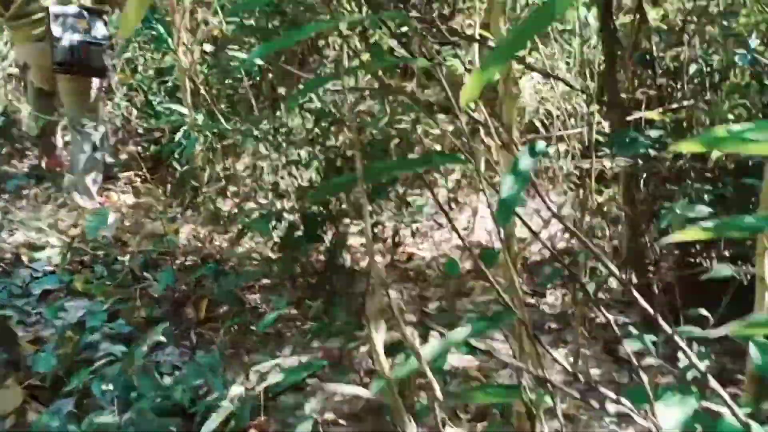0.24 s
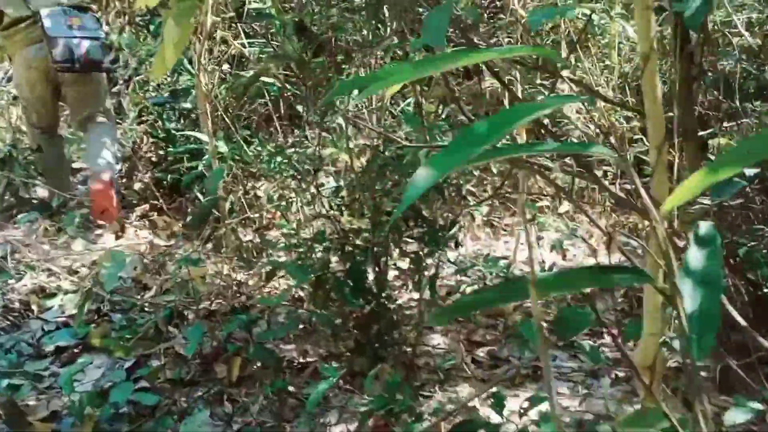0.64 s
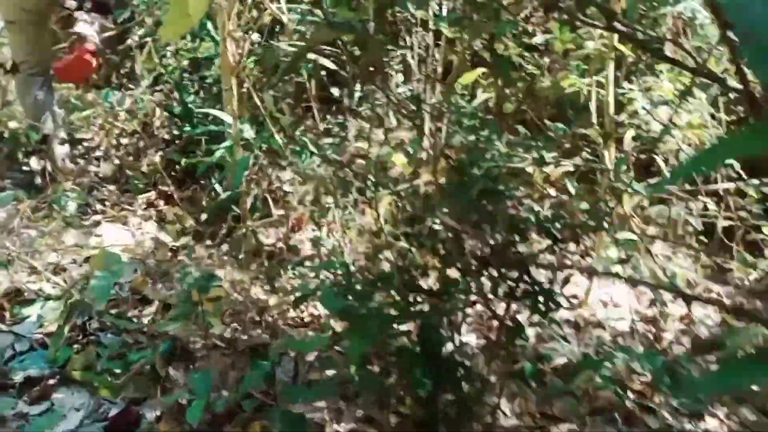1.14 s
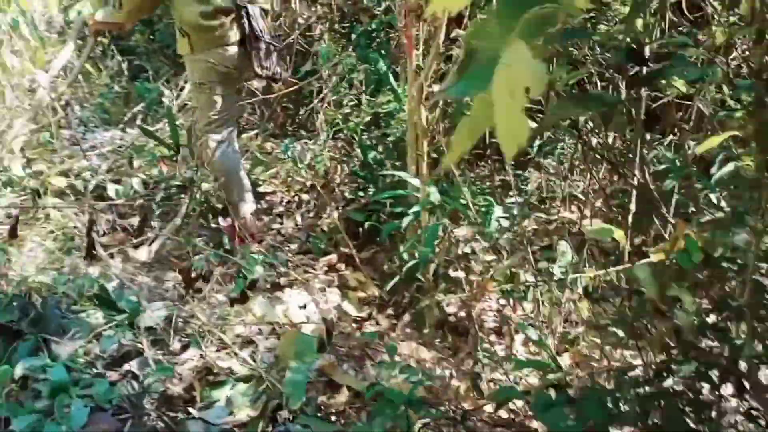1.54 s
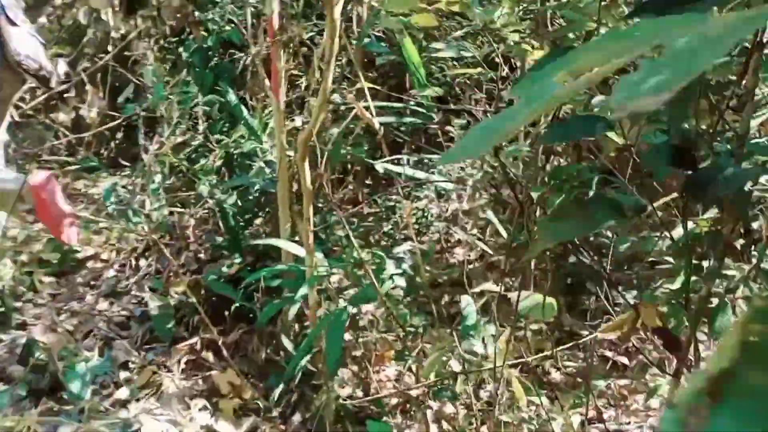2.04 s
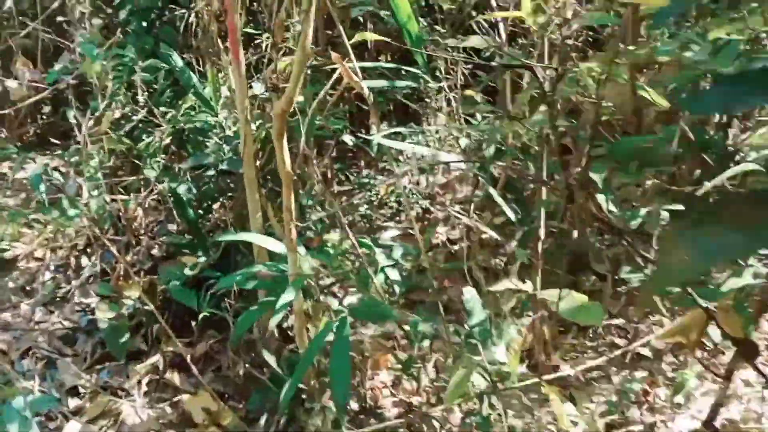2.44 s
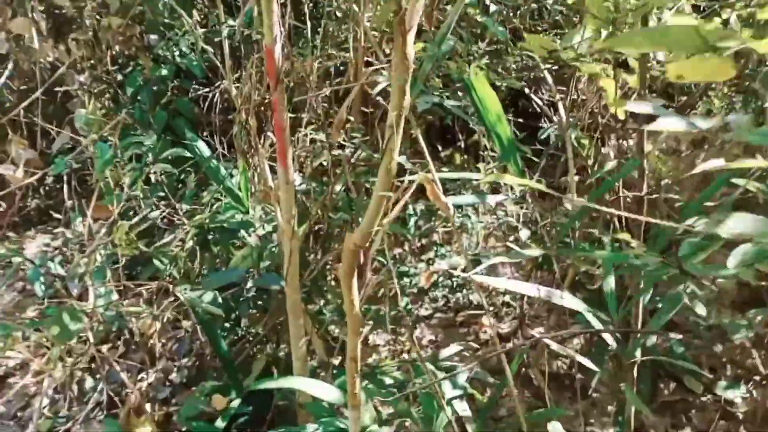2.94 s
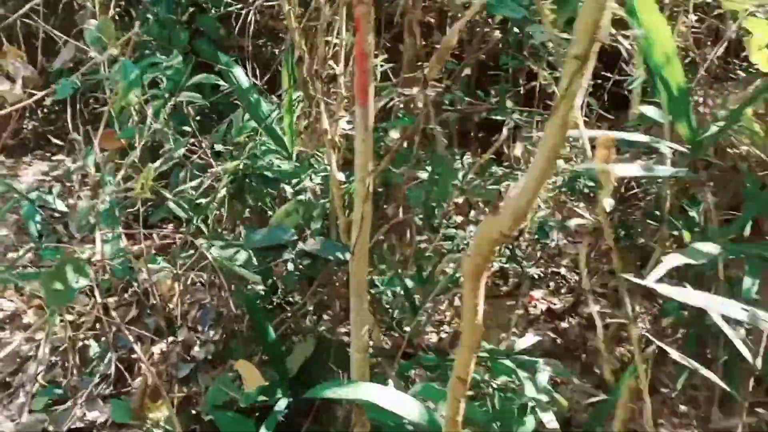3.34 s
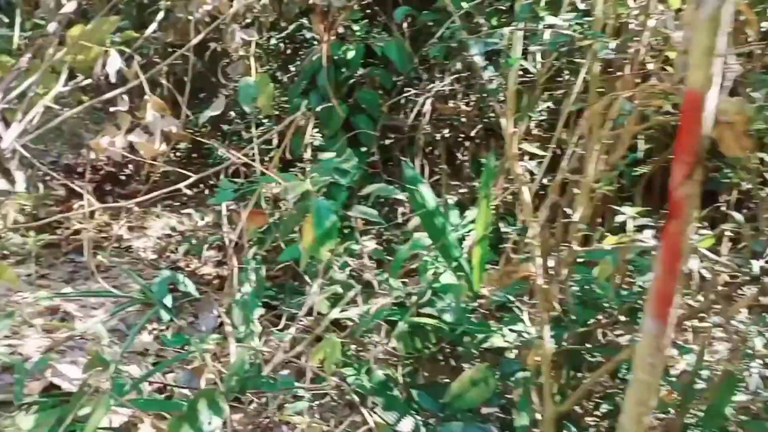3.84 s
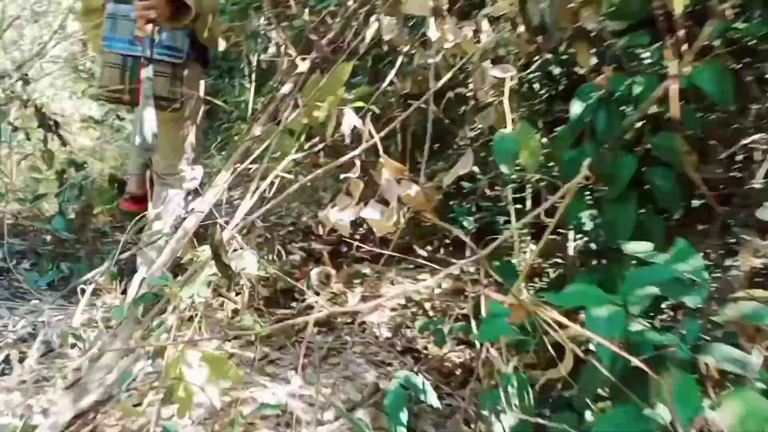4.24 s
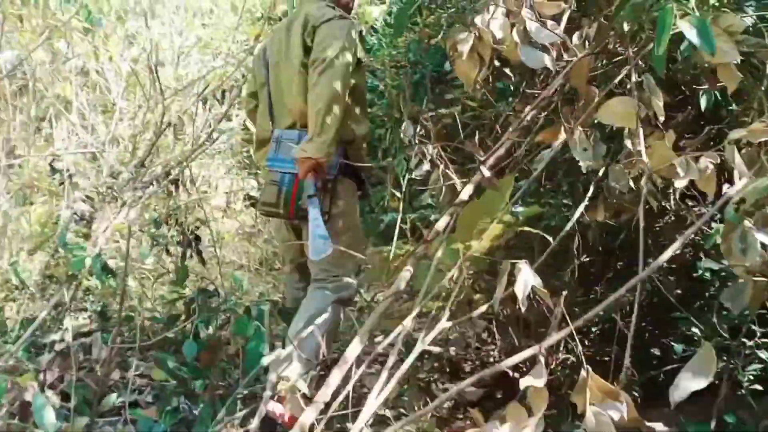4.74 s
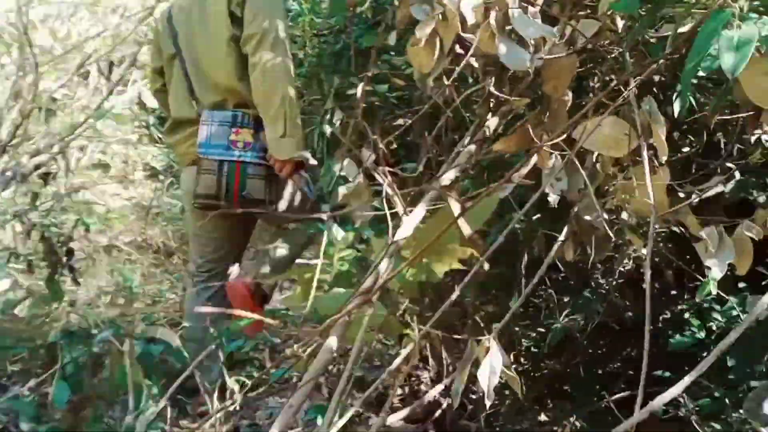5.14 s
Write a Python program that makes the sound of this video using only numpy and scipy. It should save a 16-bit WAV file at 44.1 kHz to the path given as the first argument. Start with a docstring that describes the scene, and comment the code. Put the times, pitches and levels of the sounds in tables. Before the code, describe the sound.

Footsteps crunch unevenly through dry leaves in a forest, with twigs snapping and foliage rustling against legs.

```python
"""Walking through dry leaves

Someone walks through forest litter and undergrowth, with a second walker a few metres ahead.
Each step crushes brittle leaves, whose many tiny fractures sum to a crunch; legs brush the foliage
in between. Weight thuds dully on the soil, and twigs snap underfoot and ring briefly.
Trunks scatter the snaps and the rustle, over a faint low rumble of air."""
import sys
import numpy as np
from scipy import signal
from scipy.io import wavfile

SR = 44100
rng = np.random.default_rng(int(sys.argv[2]) if len(sys.argv) > 2 else 0)


def persist_wave(psi):
    """Save psi, clipped to +-1, as 16-bit WAV."""
    counts = np.round(np.clip(psi, -1, 1) * 32767).astype(np.int16)
    wavfile.write(sys.argv[1], SR, np.atleast_2d(counts).T)


N = 237213
TIME, HZ = np.arange(N) / SR, np.fft.rfftfreq(N, 1 / SR)

# overall tone of the crunch and snaps, including the microphone's humps and dips: frequency_hz, gain_db
CRUNCH_COLOUR = [(130, -23.5), (320, -15.5), (650, -13), (1150, -8.5), (1750, -3.5), (2450, 0.5),
                 (3100, -.5), (3700, -4), (4480, -9.5), (5870, -1), (7400, 2), (9900, -14), (12500, -7.5),
                 (15500, -14.5)]
# frequency zones of pressing, crushing, rubbing and fizz: low_hz, centre_hz, high_hz
LEAF_ZONES = [(170, 550, 1200), (1200, 2500, 4500), (4500, 7000, 9800), (9800, 11500, 16000)]
# continuous rustle between steps: time_s, level_db
RUSTLE_LEVELS = [(0, -43.5), (.42, -45), (.53, -46), (.95, -43), (1.1, -45), (1.5, -43), (1.98, -42),
                 (2.12, -49), (2.5, -42.5), (2.62, -43), (2.95, -37), (3.14, -45), (3.6, -40), (4, -42),
                 (4.68, -41), (5, -36), (5.38, -44)]
# legs sweeping through foliage: start_s, length_s, level_db, extra_fizz_db
LEG_BRUSHES = [(0, .12, -34, -2), (0.327, 0.078, -41, 4), (0.702, 0.18, -42.5, 1),
               (1.115, 0.044, -37.5, -5), (1.2, 0.16, -40.5, -2.5), (1.8, 0.17, -42.5, -14),
               (2.667, 0.031, -38.5, 8), (2.734, 0.16, -35.5, 0.5), (2.879, 0.068, -33, 1),
               (3.007, 0.051, -35, 2.5), (3.34, 0.12, -33, 3.5), (3.573, 0.076, -35, 3.5),
               (3.742, 0.16, -39.5, 5.5), (4.324, 0.13, -37.5, -5), (4.607, 0.02, -43.5, 11),
               (4.863, 0.05, -31.5, 10), (4.936, 0.17, -36, -0.5), (5.16, 0.032, -32, -3),
               (5.27, 0.067, -34, 0)]
# lighter or more distant treads: start_s, length_s, level_db, extra_pressing_db
LIGHT_TREADS = [(0.048, 0.076, -42, 2), (.232, 0.046, -30, -7), (0.319, .06, -39, 0),
                (0.763, .125, -38, 0.5), (.97, 0.081, -40, 0.5), (1.687, .025, -36.5, 3.5),
                (1.813, .025, -37.5, -3), (2.77, 0.036, -36.5, -2), (2.887, 0.047, -37.5, 4),
                (2.978, 0.037, -35, 2), (3.54, 0.16, -38.5, 3.5), (5.229, 0.024, -37, 5.5)]
# near steps: heel_start_s, heel_db, sole_start_s, sole_rise_s, sole_length_s, sole_db
NEAR_STEPS = [(2.138, -25.5, 2.3, 0.036, 0.13, -24), (3.167, -31, 3.23, 0.042, 0.14, -26.5),
              (4.029, -30, 4.065, 0.087, 0.12, -25.5), (4.749, -31.5, 4.74, 0.067, .15, -22.5)]
# offset of each motion's level in the four zones: pressing_db, crushing_db, rubbing_db, fizz_db
RUSTLE_ZONE_DB = (-11, 1, 2, -7)
BRUSH_ZONE_DB = (-21.5, -5.5, 0, -10)
TREAD_ZONE_DB = (-10, 0, -2.5, -13.5)
STEP_ZONE_DB = (-15, 0, -2, -11.5)
# spectral envelope of the forest air: frequency_hz, density_db
AIR_SPECTRUM = [(20, -18), (45, -18), (85, -4), (130, -4.5), (220, -3), (500, -9), (2000, -21.5)]
# reverberation time among the trunks: frequency_hz, t60_s
FOREST_DECAY = [(300, 0.11), (2500, 0.076), (12000, 0.17)]
# impacts of feet on soil: start_s, level_db, centre_hz, t60_s
SOIL_IMPACTS = [(0.037, -63, 89, 0.46), (.15, -64, 85, 0.14), (1.331, -67, 91, .16),
                (2.161, -63, 129, 0.15), (2.998, -61, 141, 0.07), (4.153, -61, 143, 0.098),
                (4.737, -61, 150, 0.44)]
# vibration modes of a twig: pitch_ratio, relative_db
RING_MODES = [(.6, -3), (.84, -0.5), (1.001, 7.5), (1.24, -20)]
# twigs and stiff leaves breaking: start_s, pitch_hz, ring_db, splinter_db, splinter_t60_s
TWIG_SNAPS = [(0.2297, 2750, -31, -37, .03), (0.2371, 2020, -29, -48, .02), (0.2655, 5600, -31, -38, .02),
              (.3408, 1510, -31.5, -30, .017), (0.3589, 930, -36.5, -40, .016),
              (0.4938, 3080, -24, -29.5, 0.025), (.7604, 860, -38, -46, .016),
              (0.7813, 2320, -34, -38, .016), (.811, 2020, -37, -39, .016), (.928, 5510, -36.5, -41, .016),
              (1.0083, 8500, -37, -22.5, .022), (1.0088, 2000, -31.5, -40, .03),
              (1.318, 6870, -47, -29, 0.017), (1.4434, 2540, -33, -33, 0.032),
              (1.5204, 3030, -30, -42, .016), (1.5497, 2460, -33, -38, .015),
              (1.6197, 2090, -34, -43, .016), (1.6995, 2820, -37, -35, .03), (1.807, 5800, -30, -50, .03),
              (1.8247, 3020, -29.5, -31.5, .025), (2.1365, 1015, -30, -31, .04),
              (2.3393, 2980, -22.5, -25, .02), (2.814, 1590, -29.5, -32, .016),
              (2.862, 6980, -30, -42, .03), (2.873, 5900, -29.5, -45, .017), (2.9394, 5810, -25, -34, .016),
              (3.008, 1770, -22.5, -22.5, 0.02), (3.015, 1640, -27.5, -27, 0.018),
              (3.1898, 2960, -26.5, -30, .016), (3.2258, 1840, -28.5, -30, .026),
              (3.2737, 7700, -25, -24.5, .02), (3.3628, 2970, -19, -20, .026),
              (3.3732, 1810, -27, -25, .016), (3.388, 2520, -25, -36, .016),
              (3.4585, 2040, -32.5, -34, .016), (3.5514, 3200, -31, -33, .018),
              (3.7596, 7200, -29, -32, .008), (3.7718, 7960, -32, -43, .01), (4.0295, 445, -38, -39, .04),
              (4.119, 2840, -24.5, -24.5, .025), (4.174, 2500, -23, -34, .012),
              (4.2523, 2320, -32.5, -47, .017), (4.3694, 3000, -30, -37, .02),
              (4.545, 6740, -34, -38, 0.017), (4.6229, 1650, -30.5, -32.5, .025),
              (4.714, 1700, -22, -36, .016), (4.7336, 680, -38.5, -35, .015),
              (4.7638, 1970, -27.5, -29, .03), (4.8653, 2890, -26, -18, .013),
              (4.898, 2600, -25, -25, 0.016), (4.9616, 2350, -28.5, -23.5, .025),
              (5.0913, 2240, -30.5, -39, .023), (5.2426, 3100, -29, -27, .037)]


def gain_of(db):
    """Amplitude grows tenfold with every 20 dB."""
    return 10 ** (np.asarray(db) / 20)


def unit_rms(x):
    """Normalisation to a mean power of 1."""
    return x / np.sqrt(np.mean(x ** 2) + 1e-20)


def curve_at(points, hz):
    """Interpolation on a logarithmic frequency axis."""
    knots_hz, values = np.transpose(points)
    return np.interp(np.log(hz + 1), np.log(knots_hz + 1), values)


def add(mix, start_s, sound):
    """Superposition: a sound adds to the mix from start_s on."""
    part = mix[max(round(start_s * SR), 0):][:len(sound)]
    part += sound[:len(part)]


def coloured(x, spectrum):
    """A minimum-phase filter imposes a spectrum and keeps attacks sharp."""
    log_gain = np.log(gain_of(curve_at(spectrum, abs(np.fft.fftfreq(2048, 1 / SR)))))
    taps = np.fft.ifft(np.exp(np.conj(signal.hilbert(log_gain)))).real
    return signal.fftconvolve(x, taps)[:len(x)]


def stroke(start_s, length_s, rise_s, t60_s):
    """The power of a motion builds, holds, then decays exponentially as the leaves settle."""
    t = TIME - start_s
    return np.clip(t / rise_s, 0, 1) ** 2 * gain_of(-120 * np.maximum(t - length_s, 0) / t60_s)


def zone_levels():
    """Incoherent sources add in power: rustle, steps, treads and brushes set each zone's level in dB."""
    motions = [(np.interp(TIME, *np.transpose(RUSTLE_LEVELS)), RUSTLE_ZONE_DB, 1)]
    for heel_s, heel_db, sole_s, rise_s, length_s, sole_db in NEAR_STEPS:
        heel = stroke(heel_s, length_s=0.0087, rise_s=0.0087, t60_s=0.92)
        sole = stroke(sole_s, length_s, rise_s, t60_s=0.18)
        motions += [(heel_db, STEP_ZONE_DB, heel), (sole_db, STEP_ZONE_DB, sole)]
    for start_s, length_s, db, pressing_db in LIGHT_TREADS:
        tread = stroke(start_s, length_s, rise_s=0.011, t60_s=0.21)
        motions.append((db, np.add(TREAD_ZONE_DB, [pressing_db, 0, 0, 0]), tread))
    for start_s, length_s, db, fizz_db in LEG_BRUSHES:
        brush = stroke(start_s, length_s, rise_s=0.023, t60_s=0.32)
        motions.append((db, np.add(BRUSH_ZONE_DB, [0, 0, 0, fizz_db]), brush))
    power = sum(np.outer(gain_of(zone_db) ** 2, gain_of(db) ** 2 * envelope)
                for db, zone_db, envelope in motions)
    return 10 * np.log10(power)


def fractures(per_s, spread_db, t60_s):
    """Shot noise: random breaks, many small and a few large, give a power envelope of mean 1."""
    chance = np.clip(per_s / SR, 1e-4, 1)
    energy = gain_of(spread_db * np.minimum(rng.exponential(1, N), 3.6)) ** 2
    breaks = energy * (rng.random(N) < chance) / chance
    power = signal.lfilter([1], [1, -gain_of(-120 / (t60_s * SR))], breaks)
    return power / power.mean()


def crackle(low_hz, high_hz, broadband, activity, broadband_share=0.57):
    """Broadband and local breaks modulate a noise band; smaller flakes break more often and briefly."""
    smallness = np.sqrt(low_hz * high_hz) / 2500
    local = fractures(750 * activity * smallness ** 0.7, spread_db=1.5, t60_s=0.02 / smallness ** 0.064)
    power = broadband_share * broadband + (1 - broadband_share) * local
    band = signal.butter(3, [low_hz, high_hz], "band", fs=SR, output="sos")
    return signal.sosfilt(band, np.sqrt(power) * rng.standard_normal(N))


def curl_resonances(x, depth_db=2.0, width_hz=110, length_s=0.0085):
    """Each curled leaf is a brief resonator, raising a random peak in the spectrum."""
    hz, t, spectra = signal.stft(x, SR, nperseg=512, noverlap=384)
    offsets = np.arange(-12, 13)
    across_hz = np.exp(-(offsets * hz[1] / width_hz) ** 2 / 2)
    across_time = np.exp(-(offsets * t[1] / length_s) ** 2 / 2)
    patch = np.outer(across_hz, across_time)
    ripple = signal.fftconvolve(rng.standard_normal(spectra.shape), patch, "same")
    peaks = unit_rms(gain_of(depth_db * unit_rms(ripple)))
    return signal.istft(spectra * peaks, SR, nperseg=512, noverlap=384)[1][:N]


def leaves(band_count=14):
    """Brittle fracture: the harder the foot presses, the more leaves break each second."""
    levels_db = zone_levels()
    activity = gain_of(0.3 * (levels_db[1] + 35))  # follows the crushing zone
    buckling = fractures(900 * activity, spread_db=4.0, t60_s=0.07)  # whole leaves give way in clumps
    ticking = fractures(500 * activity, spread_db=3.5, t60_s=0.0012)  # their ribs part
    broadband = 0.59 * buckling + 0.19 * ticking
    density = gain_of(curve_at(CRUNCH_COLOUR, HZ)) ** 2
    zone_power = [np.mean(density * (HZ > low) * (HZ < high)) for low, _, high in LEAF_ZONES]
    drive_db = levels_db - 10 * np.log10(np.c_[zone_power])  # allows for the colouring filter's gain
    centres_hz = np.array(LEAF_ZONES)[:, 1]
    edges_hz = np.linspace(np.cbrt(170), np.cbrt(16500), band_count + 1) ** 3
    crunch = np.zeros(N)
    for low_hz, high_hz in zip(edges_hz, edges_hz[1:]):
        # each band follows the zones nearest to it
        mid_hz = np.sqrt(low_hz * high_hz)
        weights = [curve_at(np.c_[centres_hz, zone], mid_hz) for zone in np.eye(len(LEAF_ZONES))]
        crunch += gain_of(weights @ drive_db) * crackle(low_hz, high_hz, broadband, activity)
    return curl_resonances(coloured(crunch, CRUNCH_COLOUR))


def air(level_db=-57):
    """Moving air gives steady random noise, strongest at low frequencies."""
    return gain_of(level_db) * unit_rms(coloured(rng.standard_normal(N), AIR_SPECTRUM))


def forest_echoes(x, echoes_per_s=2500, first_echo_s=0.004):
    """Scattering from ground and trunks leaves a short tail whose decay depends on frequency."""
    reflections = rng.standard_normal(SR // 2) * (rng.random(SR // 2) < echoes_per_s / SR)
    reflections[:round(first_echo_s * SR)] = 0
    hz, t, spectra = signal.stft(reflections, SR, nperseg=256)
    decay = gain_of(-60 * t / curve_at(FOREST_DECAY, hz)[:, None])
    tail = signal.istft(spectra * decay, SR)[1]
    return signal.fftconvolve(x, tail / np.linalg.norm(tail))[:N]


def footfalls():
    """Damped impact: weight landing on soft soil gives a dull burst of low noise."""
    thuds, t = np.zeros(N), np.arange(SR // 4) / SR
    for start_s, level_db, centre_hz, t60_s in SOIL_IMPACTS:
        soil = signal.butter(3, [centre_hz / 1.3, centre_hz * 1.48], "band", fs=SR, output="sos")
        push = rng.standard_normal(len(t)) * gain_of(-60 * t / t60_s)
        add(thuds, start_s, gain_of(level_db) * unit_rms(signal.sosfilt(soil, push)))
    return thuds


def snap(pitch_hz, ring_db, splinter_db, splinter_t60_s=0.015):
    """Impulse excitation: a twig breaks, more fibres part, and the piece rings in its damped modes."""
    t = np.arange(SR // 12) / SR
    modes = sum(gain_of(db) * np.sin(2 * np.pi * pitch_hz * ratio * rng.uniform(0.98, 1.02) * t)
                for ratio, db in RING_MODES)
    ring_t60_s = 0.01 * (2500 / pitch_hz) ** 0.2  # thinner, higher twigs ring more briefly
    onset = 1 - np.exp(-t * pitch_hz / 0.64)
    ring = modes * onset * gain_of(-60 * t / ring_t60_s)
    fibres = rng.standard_normal(len(t)) * gain_of(-60 * t / splinter_t60_s)
    fibres[0] += 1.6  # the first sharp break
    span_hz = np.clip([pitch_hz / 6, 4 * pitch_hz], 80, 19000)  # thick, low twigs crack more dully
    crack = signal.lfilter(*signal.butter(1, span_hz, "band", fs=SR), fibres)
    splinter = coloured(crack, CRUNCH_COLOUR)
    attack_gain = np.sqrt(0.005 / t[-1])  # levels count the energy as if packed into 5 ms
    sound = attack_gain * (gain_of(ring_db) * unit_rms(ring) + gain_of(splinter_db) * unit_rms(splinter))
    return signal.lfilter(*signal.butter(2, 120, "high", fs=SR), sound)  # too small to radiate bass


def twigs(sprigs_per_s=6, low_hz=1500, high_hz=6850):
    """Wood fractures under load: loud snaps at set times, small sprigs at random."""
    snaps = np.zeros(N)
    for start_s, *twig in TWIG_SNAPS:
        add(snaps, start_s, snap(*twig))
    for when, thinness in rng.random((round(sprigs_per_s * N / SR), 2)):
        start_s = when * N / SR
        pitch_hz = low_hz * (high_hz / low_hz) ** thinness
        rustle_db = np.interp(start_s, *np.transpose(RUSTLE_LEVELS))
        add(snaps, start_s, snap(pitch_hz, ring_db=rustle_db + 0.5, splinter_db=rustle_db + 1))
    return snaps


def scene():
    """Direct and scattered sound superpose; the snaps echo more strongly than the leaves."""
    litter, snaps = leaves(), twigs()
    echoes = forest_echoes(gain_of(-16.5) * litter + gain_of(-7.5) * snaps)
    return (litter + snaps + echoes + footfalls() + air())[None]


def record(dry):
    """Band limiting: a steep low-pass filter removes the highest treble."""
    lowpass = signal.firwin(511, 15750, window=("kaiser", 9), fs=SR)
    return signal.oaconvolve(dry, lowpass[None], "same")


dry = scene()
out = record(dry)
persist_wave(out)
```